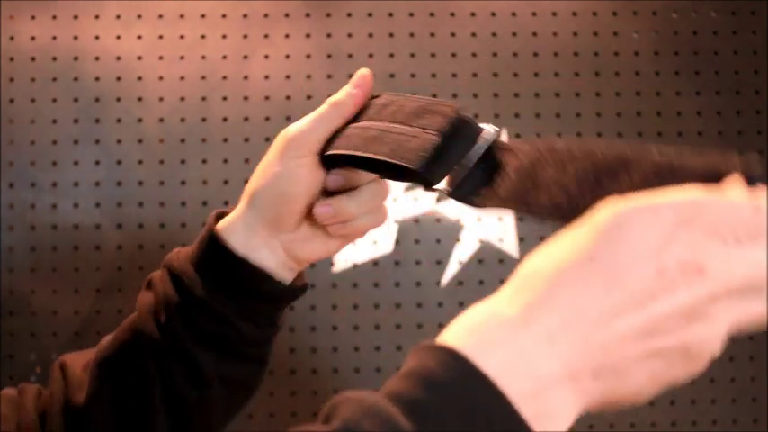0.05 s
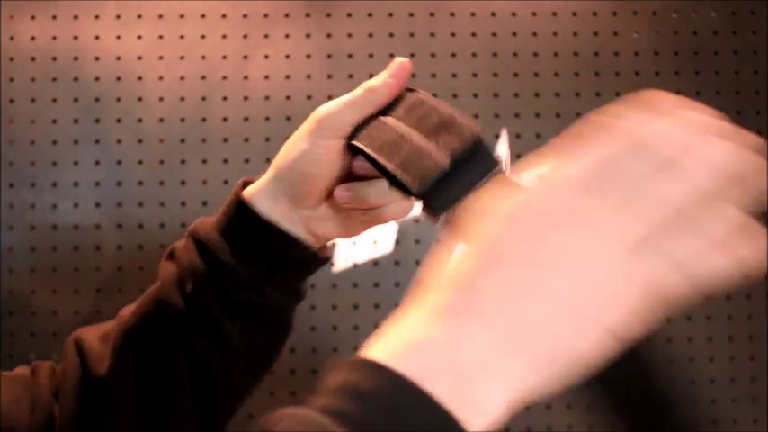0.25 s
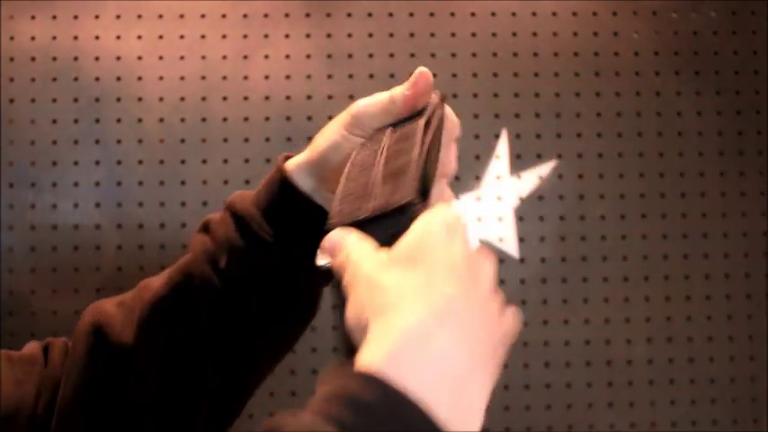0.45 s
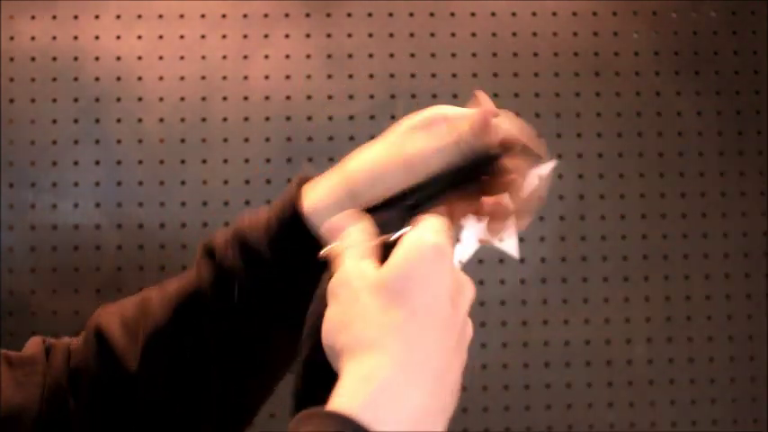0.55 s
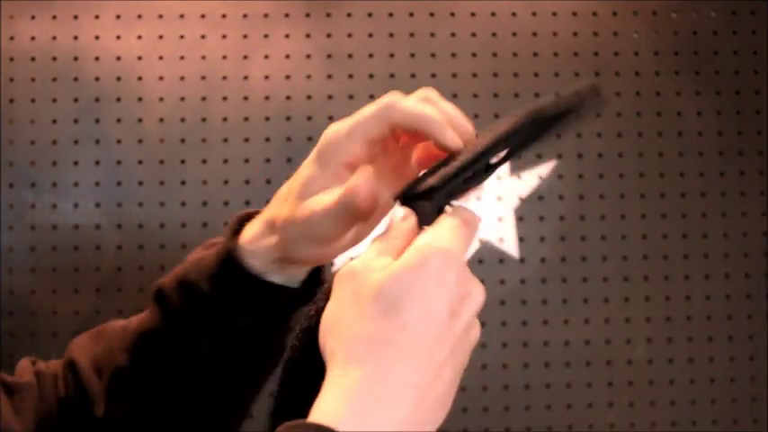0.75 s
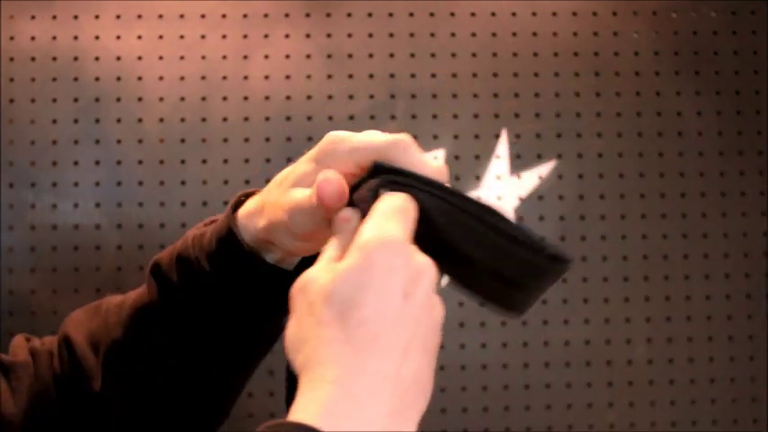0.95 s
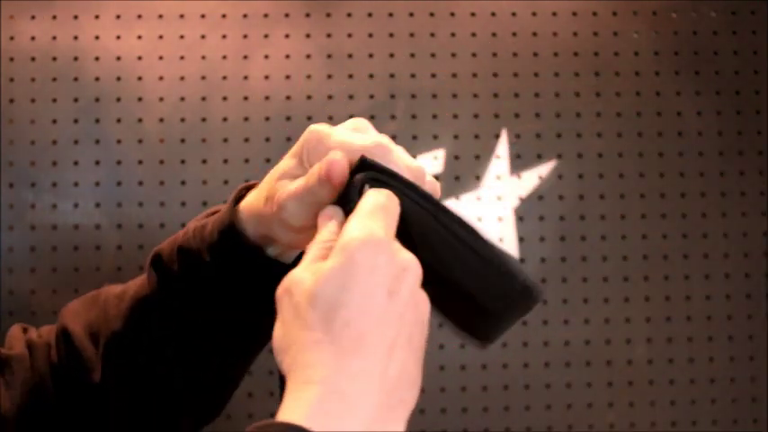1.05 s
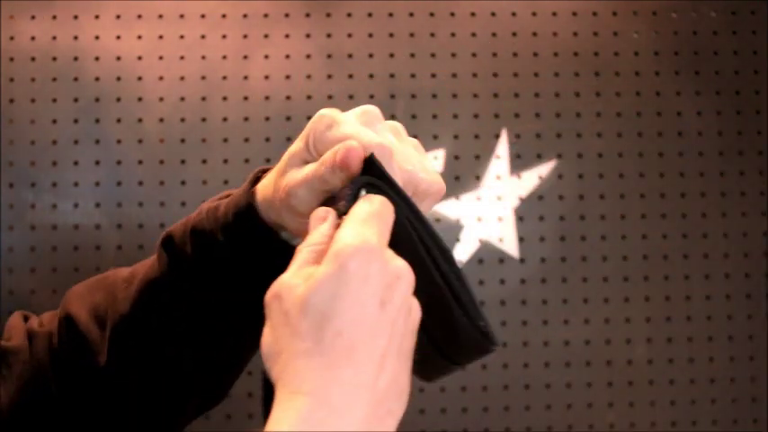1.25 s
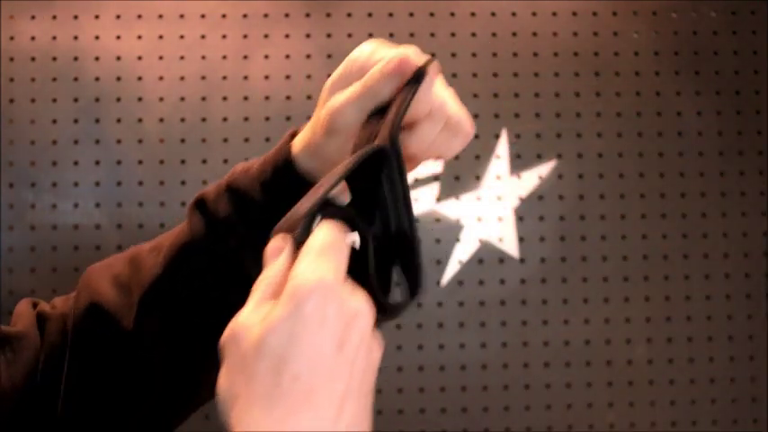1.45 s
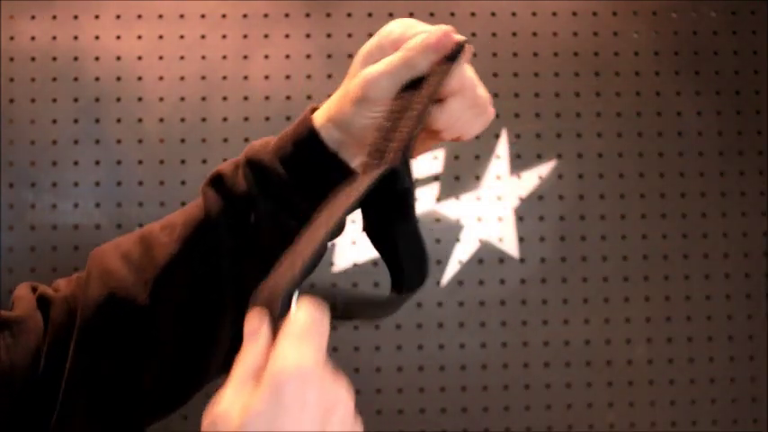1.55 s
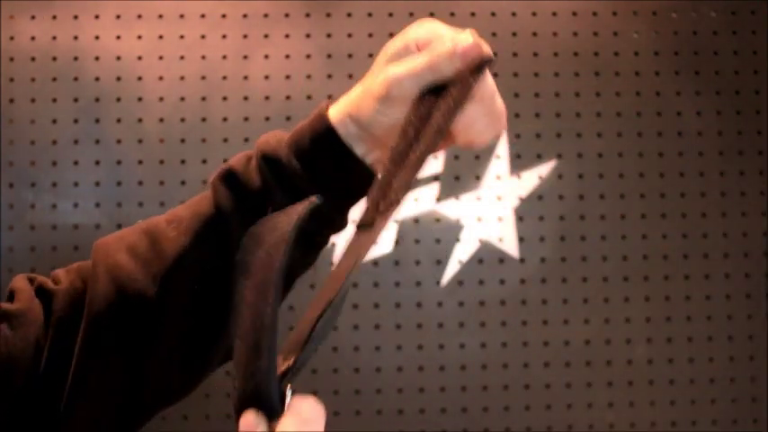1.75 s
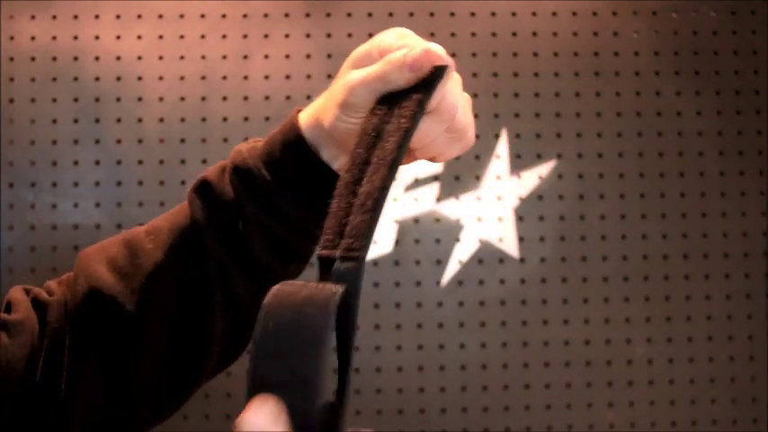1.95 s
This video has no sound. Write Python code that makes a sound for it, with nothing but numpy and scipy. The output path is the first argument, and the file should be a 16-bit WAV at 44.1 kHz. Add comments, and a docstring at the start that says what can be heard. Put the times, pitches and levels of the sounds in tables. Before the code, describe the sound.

A hook-and-loop strap is torn open close by in a small room. An earlier tear dies away at the very start. From 0.5 seconds fingers rustle over nylon and single hooks tick loose, with a dull bend near 0.9. At 1.2 seconds the peel starts in crackling fits, becomes a loud rasp and stops near 1.75, ringing briefly. A faint low machine hum lies underneath.

```python
"""A hook-and-loop strap peels open in one rasping pull: thousands of tiny hooks click out of their loops.
Before that, an earlier tear dies away, fingers rustle over the nylon and pick at the flap,
single hooks snap loose, and the stiff strap bends with dull puffs.
It all happens close by, in a small room that rings out briefly, over a low machine hum."""
import sys
import numpy as np
from scipy import signal
from scipy.fft import rfft, irfft, next_fast_len
from scipy.io import wavfile
from scipy.ndimage import uniform_filter1d, minimum_filter1d

SR = 44100
rng = np.random.default_rng(int(sys.argv[2]) if len(sys.argv) > 2 else 0)


def transcribe(signal):
    """Save signal, clipped to [-1, 1], as a 16-bit WAV file at the path in sys.argv[1]."""
    frames = np.atleast_2d(signal).T
    limited = np.clip(frames, -1, 1)
    pcm = np.round(limited * 32767).astype(np.int16)
    wavfile.write(sys.argv[1], SR, pcm)


N = 88508
LEAD = int(.25 * SR)  # samples before time zero, so the room is already ringing
TIME = np.arange(-LEAD, N) / SR

# How hard the flap is pulled. Each row: time in seconds, level in dB.
FIRST_PULL = [(-.25, -11), (-.01, -24), (.008, -34), (.03, -44), (.06, -80)]
MAIN_PULL = [(1.22, -48), (1.227, -29.5), (1.241, -26.5), (1.255, -45), (1.264, -57), (1.265, -36),
             (1.275, -22.5), (1.294, -36), (1.314, -36), (1.326, -40), (1.345, -26), (1.44, -25.5),
             (1.475, -26), (1.501, -21), (1.524, -27), (1.547, -19.5), (1.58, -24.5), (1.613, -22),
             (1.624, -33), (1.644, -23.5), (1.669, -30), (1.683, -21), (1.695, -29.5), (1.706, -23.5),
             (1.736, -22), (1.75, -31.5), (1.765, -83)]
# The peel starts in fits, then runs freely. Each row: time in seconds, share of full speed.
PEEL_SPEED = [(0, 0.83), (1.22, 0.095), (1.32, 0.24), (1.42, .9), (1.75, 0.99)]
# The tone of tearing. Each row: frequency in Hz, level in dB.
TEAR_TONE = [(40, -43), (100, -36), (250, -18.5), (370, -10), (500, -12), (640, -6.5), (790, -13),
             (1200, -7), (1550, -5.5), (1900, -4.5), (3000, -2.5), (5000, 1), (7000, -1.5), (9500, -4.5),
             (13000, -2.5), (15800, -8)]
def tears(hooks_per_s=9000):
    """As the flap peels, hooks leave their loops so fast that the clicks blur into a rasp."""
    pull = sum(level(rows) * (TIME > rows[0][0]) * (TIME < rows[-1][0])
               for rows in (FIRST_PULL, MAIN_PULL))
    speed = np.interp(TIME, *np.transpose(PEEL_SPEED))
    return pull * crackle(hooks_per_s * speed, TEAR_TONE)


# Single hooks letting go. Each row: start in seconds, level in dB, pitch in Hz.
HOOK_SNAPS = [(0.3242, -47.5, 7900), (0.349, -53, 8000), (0.48, -34.5, 8850), (.5418, -30, 5460),
              (.591, -28, 6600), (.655, -35, 2870), (.834, -31, 4200), (.9033, -15, 4260),
              (0.9351, -19, 4400), (.944, -19.5, 4200), (.947, -24, 6160), (1.0277, -27, 5500),
              (1.0542, -19.5, 6000), (1.0705, -27, 9000), (1.082, -17, 5900), (1.109, -19, 5000),
              (1.1267, -14, 5370), (1.167, -27, 9000), (1.1998, -19.5, 5230), (1.208, -34, 5500),
              (1.2294, -25, 6000), (1.2381, -7, 4400), (1.2403, -20, 10000), (1.2668, -12, 6900),
              (1.2679, -9, 6000), (1.2705, -2.5, 5400), (1.272, -20, 9000), (1.2858, -12, 5400),
              (1.3125, -7.5, 5550), (1.319, -15, 6000), (1.3239, 0, 6600), (1.3245, -3, 6200),
              (1.3268, -12, 5600), (1.3375, -21, 6500), (1.444, 2, 4030), (1.6015, -9, 4600)]
def snaps(shake_peak_s=.00041, low_cut_hz=850):
    """A tight hook lets go with a sharp tick, then shakes the fibres around it."""
    out = np.zeros(len(TIME))
    t = np.arange(SR // 50) / SR
    for start_s, db, hz in HOOK_SNAPS:
        tick = ring(1.0 * (t == 0), hz)
        tick /= np.abs(tick).max()
        shake = noise(len(t), TEAR_TONE) * t / shake_peak_s * np.exp(1 - t / shake_peak_s)
        start = LEAD + int(start_s * SR)
        out[start:start + len(t)] += from_db(db) * (tick + from_db(-11) * shake)
    return signal.sosfilt(signal.butter(2, low_cut_hz, "high", fs=SR, output="sos"), out)


# How loud the fingers, sliding hand and rumble are. Each row: time in seconds, level in dB.
FINGER_LEVEL = [(.25, -88), (.47, -68.5), (.62, -60.5), (.655, -54), (.71, -49), (.745, -57), (.785, -42),
                (.82, -50.5), (.89, -56.5), (.925, -49), (.948, -36), (.97, -53), (1.045, -51),
                (1.085, -40), (1.118, -44.5), (1.135, -32), (1.18, -49.5), (1.21, -41), (1.3, -42),
                (1.8, -79), (1.92, -70), (1.97, -84)]
SLIDE_LEVEL = [(.46, -77), (.525, -56), (.54, -46.5), (.565, -48), (.585, -51.5), (.605, -46), (.62, -62),
               (.66, -80)]
RUMBLE_LEVEL = [(.4, -94), (.5, -64), (.6, -67), (.66, -59), (.8, -60.5), (.96, -62.5), (1.1, -64),
                (1.2, -86)]
# Their tones. Each row: frequency in Hz, level in dB.
FINGER_TONE = [(100, -56), (350, -11), (700, -9), (1200, -3), (2000, 0.5), (4200, -1), (7000, -3.5),
               (9500, -6.5), (13000, -3.5), (15800, -9)]
SLIDE_TONE = [(300, -10), (1200, -2.5), (2800, -6), (4000, 3), (6500, -2.5), (9000, -3), (13000, 0),
              (15800, -2)]
RUMBLE_TONE = [(25, -41), (50, -13), (80, 11), (115, -9), (200, -7), (500, -9), (2000, -36)]
def rustle(fibres_per_s=5000):
    """Fingers drag over the weave, a hand slides along the strap, and hands and sleeves rumble."""
    fingers = level(FINGER_LEVEL) * crackle(fibres_per_s, FINGER_TONE)
    slide = level(SLIDE_LEVEL) * crackle(fibres_per_s, SLIDE_TONE)
    rumble = level(RUMBLE_LEVEL) * noise(len(TIME), RUMBLE_TONE)
    return fingers + slide + rumble


# Bends of the strap. Each row: start in seconds, level in dB.
BENDS = [(.015, -48.5), (0.903, -41), (0.943, -53)]
# Their tone. Each row: frequency in Hz, level in dB.
BEND_TONE = [(80, -2), (150, -10), (300, -4.5), (600, -3.5), (1150, -2), (2200, -13), (5000, -19)]
def bends(fade_s=.021):
    """The stiff strap gives a dull puff each time it bends."""
    puffs = sum(from_db(db) * (TIME > start) * np.exp(-np.abs(TIME - start) / fade_s)
                for start, db in BENDS)
    return puffs * noise(len(TIME), BEND_TONE)


# How long the room rings. Each row: frequency in Hz, seconds to fade by 60 dB.
ECHO_FADE = [(300, .3), (800, 0.55), (1800, 0.4339), (4000, .5), (9000, 0.375), (15000, 0.1542)]
# How loud it rings. Each row: frequency in Hz, level in dB compared with the direct sound.
ECHO_LEVEL = [(300, -4.5), (1300, -4), (4000, -9), (9000, -10), (15000, -3)]
def room_echo(gap_s=.003, early_fade_s=.0078, early_db=-6.5):
    """The echo of one click: quick bounces off the bench and hands, then a fading wash."""
    t = np.arange(SR // 2) / SR
    edges_hz = np.geomspace(150, 17000, 11)
    tail = 0
    for low, high in zip(edges_hz, edges_hz[1:]):
        hz = np.sqrt(low * high)
        band_pass = signal.butter(2, [low, high], "band", fs=SR, output="sos")
        band = signal.sosfilt(band_pass, rng.standard_normal(len(t)))
        fade = np.exp(-np.log(1000) * t / at_hz(ECHO_FADE, hz)) * (t > gap_s)
        tail += from_db(at_hz(ECHO_LEVEL, hz)) * band * fade / np.linalg.norm(fade)
    early = rng.standard_normal(len(t)) * np.exp(-t / early_fade_s) * (t > gap_s)
    return tail + from_db(early_db) * early / np.linalg.norm(early)


def room(strap, places=3, move_s=.07):
    """The moving strap passes through a few places in turn, each with its own echo."""
    out = 0
    for place in range(places):
        away = np.abs((TIME / move_s + place) % places - places / 2)
        share = np.cos(np.pi / 2 * np.minimum(away, 1))
        out += signal.fftconvolve(strap * share, room_echo())[:len(strap)]
    return out


# The machine's low notes. Each row: pitch in Hz, level in dB before the swell.
HUM_NOTES = [(53.5, -70.5), (79, -69.5), (103, -67), (131.5, -53.5), (142.3, -45.5), (158.5, -53),
             (213.8, -57), (238, -62.5), (286, -65.5), (317.6, -68)]
# The tone of the room noise. Each row: frequency in Hz, level in dB.
AIR_TONE = [(25, -8), (70, -6), (140, 0.5), (300, -11), (500, -14), (640, -16.5), (1000, -20.5),
            (3000, -24), (8000, -24), (16000, -38)]
# Both swell and sink together. Each row: time in seconds, change in dB.
SWELL = [(0, -21), (.06, -14), (.3, -9), (.5, -6), (.75, -1), (1.275, -1.5), (1.3, -11.5), (1.6, -8.5),
         (1.79, -12.5), (1.84, -11), (1.96, -10), (2.0, -14)]
def hum_and_air(waver_db=1.3, wander_radians=.2, air_db=-55.5):
    """A machine hums in wavering notes that beat against each other, over soft room noise."""
    hum = 0
    for hz, db in HUM_NOTES:
        strength = np.sqrt(2) * from_db(db + waver_db * drift(1.15))
        phase = 2 * np.pi * (hz * TIME + rng.random()) + wander_radians * drift(2.4)
        hum += strength * np.sin(phase)
    air = from_db(air_db) * noise(len(TIME), AIR_TONE)
    return level(SWELL) * (hum + air)


def crackle(per_s, tone, spread_db=4, ring_gain=4.03):
    """Hooks or fibres let go at random, each a click of its own size with a short ring."""
    n = len(TIME)
    sizes = from_db(spread_db * np.minimum(rng.exponential(1, n), 4)) * rng.choice([-1, 1], n)
    clicks = sizes * (rng.random(n) < per_s / SR)
    pitches_hz = np.geomspace(1800, 13000, 12)
    picked = rng.integers(0, len(pitches_hz), n)
    rings = sum(ring(clicks * (picked == k), hz) for k, hz in enumerate(pitches_hz))
    grains = with_tone(clicks + ring_gain * rings, tone)
    return grains / np.sqrt(uniform_filter1d(grains ** 2, size=600) + 1e-6)  # even out the loudness


def ring(x, hz, cycles=4.5):
    """Make x ring at one pitch, fading by 60 dB within the given cycles."""
    r = np.exp(-np.log(1000) * hz / (cycles * SR))
    feedback = [1, -2 * r * np.cos(2 * np.pi * hz / SR), r * r]
    return signal.lfilter(np.array([1, 0, -1]) * (1 - r * r) / 2, feedback, x + 1e-18)


def with_tone(x, tone):
    """Filter x to follow a tone table, at an average level of 1."""
    size = next_fast_len(len(x)) * 2
    hz = np.arange(size // 2 + 1) * SR / size
    cepstrum = irfft(np.log(from_db(at_hz(tone, hz))))
    # Fold the filter so that nothing rings before its click (minimum phase).
    cepstrum[1:size // 2] *= 2
    cepstrum[size // 2 + 1:] = 0
    response = np.exp(rfft(cepstrum))
    return rms_one(irfft(rfft(x, size) * response)[:len(x)])


def noise(samples, tone):
    """Steady noise with the given tone."""
    return with_tone(rng.standard_normal(samples), tone)


def drift(hz, steps_per_s=SR / 100):
    """A smooth random wobble, about 1 in size."""
    r = np.exp(-2 * np.pi * hz / steps_per_s)
    slow = signal.lfilter([1], [1, -2 * r, r * r], rng.standard_normal(3000))[1000:]
    return np.interp(TIME - TIME[0], np.arange(len(slow)) / steps_per_s, rms_one(slow))


def level(rows):
    """Join rows of seconds and dB into a volume curve."""
    return from_db(np.interp(TIME, *np.transpose(rows)))


def at_hz(rows, hz):
    """Look up a table by frequency, on a scale of octaves."""
    row_hz, values = np.transpose(rows)
    return np.interp(np.log(np.maximum(hz, 1)), np.log(row_hz), values)


def from_db(db):
    """Turn decibels into a multiplier."""
    return 10 ** (np.asarray(db) / 20)


def rms_one(x):
    """Scale to an average level (rms) of 1."""
    return x / np.sqrt(np.mean(x ** 2) + 1e-20)


def scene():
    """The strap, its echo and the hum, in one channel."""
    strap = tears() + rustle() + snaps() + bends()
    return (strap + room(strap) + hum_and_air())[None, LEAD:]


def record(dry):
    """A fast limiter turns down the sharpest peaks, and the highest treble is cut away."""
    limit, window, cutoff_hz = .42, int(.0019 * SR), 15900
    allowed = limit / np.maximum(np.abs(dry), limit)
    gain = uniform_filter1d(minimum_filter1d(allowed, size=window), size=window)
    return signal.sosfilt(signal.ellip(10, .2, 80, cutoff_hz, fs=SR, output="sos"), dry * gain)


dry = scene()
out = record(dry)
transcribe(out)
```